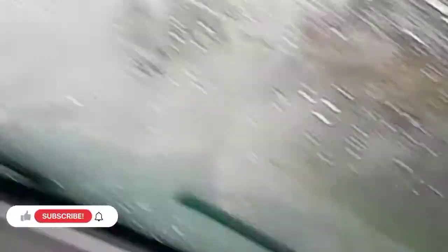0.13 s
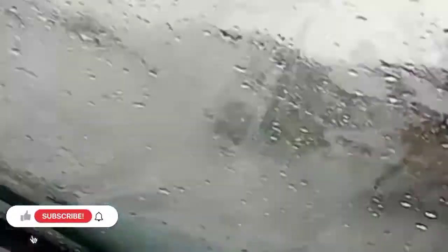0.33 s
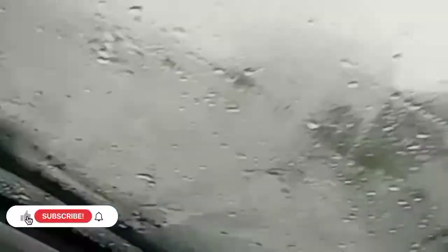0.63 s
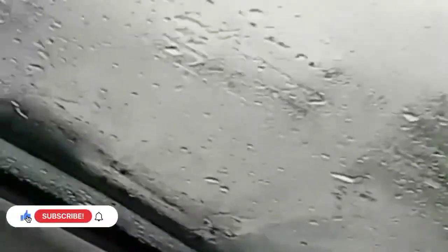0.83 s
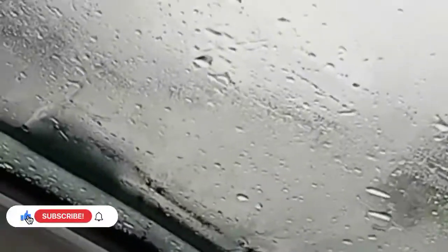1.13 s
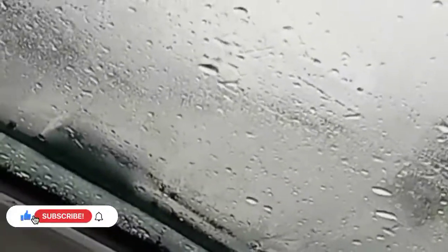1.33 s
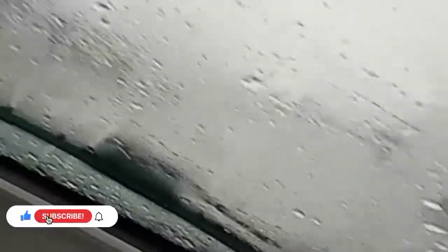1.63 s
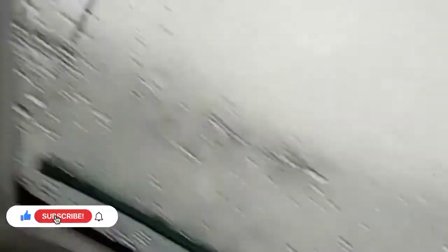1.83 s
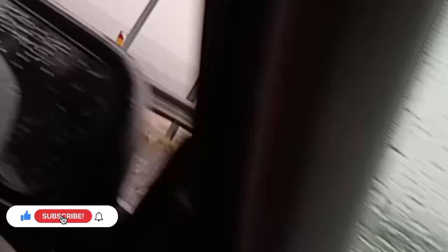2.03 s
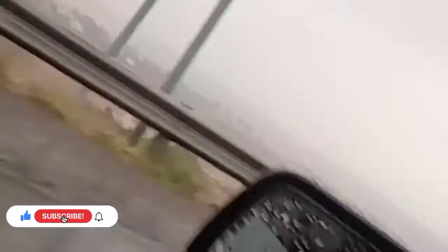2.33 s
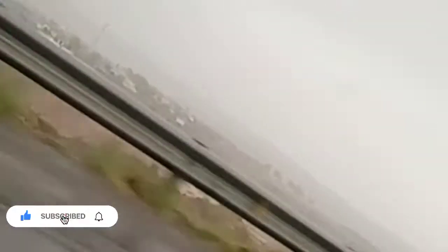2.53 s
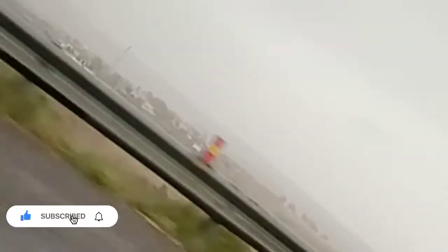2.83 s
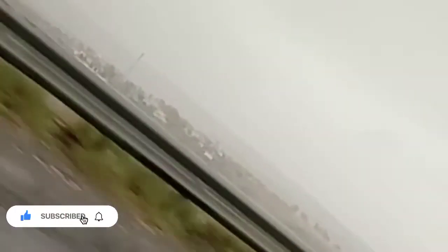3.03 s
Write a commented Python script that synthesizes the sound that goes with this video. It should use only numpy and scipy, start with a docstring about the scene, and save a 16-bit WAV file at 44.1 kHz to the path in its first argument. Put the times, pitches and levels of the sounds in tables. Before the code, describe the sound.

Car interior driving in rain: steady deep rumble, faint engine hum, crisp pattering drops and soft hiss

```python
"""Inside a car driving through rain, with a hand-held phone as the listening point.
At first the phone faces ahead: shaped noise roars as road and wind, and wandering sines make two low cabin
hums and the engine. Spray hisses, easing in the first second, while ticks and noise bursts ring as rain
drops: a dense patter, larger nearer drops and a few short notes. From about 1.7 s the phone turns to the
side window, the balance of roar, hums and engine changes, and the upper roar then swells."""
import sys
import numpy as np
from scipy import signal
from scipy.fft import rfft, irfft
from scipy.io import wavfile

SR = 44100
rng = np.random.default_rng(int(sys.argv[2]) if len(sys.argv) > 2 else 0)


def dump(signal):
    """Clip the signal to [-1, 1] and save it as 16-bit WAV at the path in sys.argv[1]."""
    limited = np.clip(np.atleast_2d(signal).T, -1, 1)
    pcm = np.round(limited * 32767).astype(np.int16)
    wavfile.write(sys.argv[1], SR, pcm)


N = 140679

# Colour of spray and far rain, also lent to the patter: (pitch_hz, relative level_db per Hz)
SPRAY_COLOUR = [(800, 16), (1100, -6.5), (1400, -9.5), (2300, -9), (2700, -8), (4000, -16), (5200, -21.5),
                (6600, -21.5), (7300, -32), (8100, -38.5), (10000, -43), (11500, -45), (13200, -46.5),
                (13900, -40.5), (14600, -42.5), (15100, -37), (16500, -28)]


def amp(db):
    """Turn decibels into a gain."""
    return 10 ** (np.asarray(db) / 20)


def rms_one(x):
    """Scale a signal to an rms of 1."""
    return x / np.sqrt(np.mean(x ** 2) + 1e-20)


def in_time(rows):
    """Read a (time, value) curve at every sample, with straight lines between its points."""
    return np.interp(np.arange(N) / SR, *np.transpose(rows))


def at_hz(points, hz):
    """Read a (frequency, level) curve on a logarithmic frequency axis."""
    point_hz, level_db = np.transpose(points)
    return np.interp(np.log(hz), np.log(point_hz), level_db)


def drift(rate):
    """Random wandering around zero, spread about 1: noise smoothed twice at the rate in Hz."""
    step = 40  # samples between the slow values
    r = np.exp(-2 * np.pi * rate * step / SR)
    white = rng.standard_normal(N // step + 2002)
    slow = signal.lfilter([1], [1, -2 * r, r * r], white)[2000:]  # leave out the filter's start
    return np.interp(np.arange(N) / step, np.arange(len(slow)), rms_one(slow - slow.mean()))


def resonate(x, hz, width_hz):
    """Ring at one frequency: a two-pole resonance with a gain of about 1 at its top."""
    r = np.exp(-np.pi * width_hz / SR)
    feedback = [1, -2 * r * np.cos(2 * np.pi * hz / SR), r * r]
    return signal.lfilter(np.array([1, 0, -1]) * (1 - r * r) / 2, feedback, x)


def coloured(spectrum, x, low, high):
    """Shape a signal by a spectrum and keep it between low and high (Hz) with soft edges."""
    hz = np.maximum(np.fft.rfftfreq(N, 1 / SR), 1)
    edge = 1 / np.sqrt((1 + (low / hz) ** 40) * (1 + (hz / high) ** 40))
    return irfft(rfft(x) * amp(at_hz(spectrum, hz)) * edge, N)


def patchy(spectrum, edges, patchy_db, rate):
    """Coloured noise in bands; each band's level flickers with a shared and an own drift."""
    shared = drift(rate / 4)
    out = 0
    for low, high in zip(edges, edges[1:]):
        band = coloured(spectrum, rng.standard_normal(N), low, high)
        out = out + band * amp(patchy_db * (shared + drift(rate)))
    return out


def roar(turn):
    """Road and wind through the body: shaped noise whose colour fades from ahead to side with the turn."""
    # Roar colours, facing ahead and facing the side window: (pitch_hz, relative level_db per Hz)
    ahead_colour = [(25, -40.5), (45, -10), (60, -5.5), (78, -11), (100, -9), (115, -8), (140, -5.5),
                    (160, -8), (200, -1.5), (257, -8.5), (280, -13.5), (350, -16.5), (510, -22), (560, -25),
                    (1500, -43.5), (2200, -60.5)]
    side_colour = [(25, -37.5), (45, -6.5), (60, 0), (78, -8.5), (100, 2), (119, -4), (160, 0.5),
                   (209, 1.5), (253, 3.5), (316, -11.5), (375, -13), (476, -14), (800, -22.5),
                   (1500, -36.5), (2200, -59)]
    # Lift of the part above 290 Hz, before each colour is evened to one level: (time_s, lift_db)
    upper_lift = [(0, 1.5), (0.5, -0.1), (1.2, 0.6), (1.5, 0), (1.95, -0.5), (2.4, 2), (3.19, 2)]
    roar_db, patchy_db = -18.5, 0.71
    swell = amp(in_time(upper_lift))
    out = 0
    for spectrum, share in ((ahead_colour, 1 - turn), (side_colour, turn)):
        bass = patchy(spectrum, [10, 130, 290], patchy_db, rate=29)
        upper = patchy(spectrum, [290, 700, 1800], patchy_db, rate=10)
        out = out + np.sqrt(share) * rms_one(bass + upper * swell)
    return amp(roar_db) * out


def hums(turn):
    """Two low hums of the car's cabin, booming as it drives: sines wandering in pitch and level."""
    # One row a hum: (pitch_hz, wander as a share of pitch, waver_db, ahead_db, side_db), levels as rms
    hum_rows = [(55.9, 0.031, 2.5, -26.5, -28.5), (96.9, 0.012, 1.5, -24.5, -25)]
    out = 0
    for hz, wander, waver_db, ahead_db, side_db in hum_rows:
        level = amp(ahead_db + (side_db - ahead_db) * turn + waver_db * drift(3.5))
        phase = 2 * np.pi * np.cumsum(hz * (1 + wander * drift(6.5))) / SR
        out = out + np.sqrt(2) * level * np.sin(phase + rng.uniform(0, 2 * np.pi))
    return out


def engine(turn):
    """Engine orders: wavering sines on whole multiples of one slightly wandering base rate."""
    # One row an order: (multiple of the base rate, relative ahead_db, relative side_db)
    orders = [(4, -25.5, -33), (5, -26, -28.5), (6, -24.5, -30), (7, -32, -38), (10, -36.5, -34.5),
              (11, -40.5, -45.5)]
    base_hz, wander_share = 34.88, 0.009
    engine_db, waver_db = 0.58, 2.5
    phase = 2 * np.pi * np.cumsum(base_hz * (1 + wander_share * drift(2.9))) / SR
    out = 0
    for multiple, ahead_db, side_db in orders:
        level = amp(ahead_db + (side_db - ahead_db) * turn + waver_db * drift(5.4))
        out = out + np.sqrt(2) * level * np.sin(round(multiple) * phase + rng.uniform(0, 2 * np.pi))
    return amp(engine_db) * out


def spray(level_db):
    """Spray and far rain: many blended splashes heard as hissing noise, its highest part flickering faster."""
    low = patchy(SPRAY_COLOUR, [1100, 2200, 4400, 8000, 14200], 0.8, rate=6.7)
    top = patchy(SPRAY_COLOUR, [14200, 20000], 1.8, rate=25)
    return amp(level_db) * rms_one(low + top)


def plips():
    """Some drops ring one short note: a sine with a quick rise that dies away."""
    # One row a note: (start_s, relative level_db, pitch_hz)
    notes = [(0.676, -24.5, 1140), (0.883, -24, 2524), (1.009, -21.5, 2460), (1.5, -26, 2660),
             (2.043, -24.5, 1786), (2.072, -26.5, 1810), (2.118, -24, 1640), (2.36, -30, 1547),
             (2.454, -22, 1580), (2.678, -25.5, 1660), (3.15, -25, 1725)]
    plip_db, t60_s, rise_s = -5.5, 0.053, 0.00088
    t = np.arange(SR // 10) / SR
    out = np.zeros(N + SR)
    for start_s, level_db, hz in notes:
        i = int(start_s * SR)
        envelope = amp(level_db + plip_db - 60 * t / t60_s) * np.minimum(t / rise_s, 1)
        out[i:i + len(t)] += envelope * np.sin(2 * np.pi * hz * t)
    return out[:N]


def splash(where, tick_db, band_db, pitches):
    """Each drop is a dry tick and a dying noise burst; both ring every panel resonance at its own strength."""
    burst_t60_s, ring_cycles = 0.032, 11.5
    fall = amp(-60 / (burst_t60_s * SR))
    out = 0
    for hz, tick, burst in zip(pitches, tick_db.T, band_db.T):
        ticks, clicks = np.full((2, N), 1e-12)
        np.add.at(ticks, where, amp(tick) * np.sqrt(SR / hz))
        np.add.at(clicks, where, amp(burst))
        # Each click becomes a falling envelope that shapes the noise
        x = ticks + signal.lfilter([1], [1, -fall], clicks) * rng.standard_normal(N)
        width_hz = hz * 3 / ring_cycles
        ringing = resonate(resonate(x, hz, width_hz), hz, width_hz)
        out = out + ringing * np.sqrt(SR / hz)
    return out


def patter(level_db, hz):
    """Small drops at random times and sizes, coloured like the spray and rising and falling with it."""
    drops_per_s, patter_db, tick_db = 280, -52.5, 13.5
    size_scale_db, colour_spread_db = 4.39, 6.5
    thin_hz = 1800  # small drops carry little below this
    count = int(np.ceil(drops_per_s * N / SR))
    draw = rng.random((count, 2))
    where = (draw[:, 0] * N).astype(int)
    size = patter_db + level_db[where] - level_db.mean()
    size = size - size_scale_db * np.log(1 - .98 * draw[:, 1])  # many small drops, few big ones
    burst = size[:, None] + at_hz(SPRAY_COLOUR, hz) + 10 * np.log10(hz / 2500)
    burst = burst + colour_spread_db * np.tanh(rng.standard_normal((count, len(hz))))
    burst = burst - 10 * np.log10(1 + (thin_hz / hz) ** 4)
    return where, burst + tick_db, burst


def large_drops(hz):
    """Larger, nearer drops at set times; each has its own tick strength and splash colour."""
    # One row a drop: (start_s, tick_db, splash_db at 1-2, 2-4, 4-7, 8-12 and 12-16 kHz), relative levels
    drops = np.array([(0.0608, -24, -54, -33, -24.5, -66, -61), (0.1161, -6, -66, -17, -31, -62, -44),
                      (0.1773, -22, -54.5, -39, -50.5, -67, -67), (0.195, -32, -30.5, -22, -40, -59, -61),
                      (0.2927, -39, -31, -38.5, -43.5, -74, -74),
                      (0.3298, -16, -37.5, -45.5, -34, -53, -56),
                      (0.392, -41, -39.5, -20.5, -24.5, -42, -52),
                      (0.4269, -24.5, -35, -20, -28.5, -59, -38), (0.5158, -16, -29, -22, -24.5, -44, -71),
                      (0.598, -29, -60, -25, -33, -64, -66), (0.6773, -23, -26.5, -26.5, -31.5, -70, -64),
                      (0.761, -35.5, -42, -47, -45, -71, -69), (0.8075, -32, -32.5, -37, -37, -55, -52),
                      (0.8824, -19.5, -31, -35.5, -32.5, -45, -30.5),
                      (1.0051, -33.5, -25.5, -22, -27.5, -77, -67), (1.0854, -36, -48, -36, -35, -59, -68),
                      (1.1335, -32.5, -50.5, -54, -54, -59, -62.5),
                      (1.1937, -35, -38, -35, -34, -69, -64.5), (1.2121, -29, -40, -41.5, -33, -72, -72),
                      (1.579, -34, -36.5, -33, -42, -68, -67), (1.7413, -41, -45, -39, -28.5, -69, -54),
                      (1.7905, -17.5, -25, -38, -21, -71.5, -62), (1.8164, -29, -38, -36, -31.5, -73, -60),
                      (1.849, -30, -43, -46.5, -39.5, -67, -62.5),
                      (1.9002, -25, -36, -38.5, -46, -63.5, -70), (1.9285, -29, -46, -30, -26.5, -76, -67),
                      (2.0449, -35, -38.5, -33, -33, -69, -66), (2.0706, -31, -41.5, -43, -31.5, -61, -57),
                      (2.1191, -20, -31, -22, -31.5, -47, -62), (2.2762, -37, -22, -33, -34, -60, -60),
                      (2.3376, -26.5, -34, -32, -29, -64, -69), (2.4222, -35, -29, -23.5, -40, -68, -68),
                      (2.4529, -26, -31, -32.5, -50, -71, -62), (2.4883, -19, -34.5, -35, -30, -77, -64),
                      (2.5402, -24, -29, -48, -40, -65, -62), (2.607, -27, -41.5, -24.5, -27.5, -64, -66),
                      (2.7796, -28.5, -34.5, -43, -69, -89, -72), (2.856, -31, -32.5, -34, -44.5, -67, -59),
                      (2.9676, -25, -31.5, -24, -24, -66, -56), (3.087, -21, -30, -37, -33.5, -66, -49),
                      (3.1054, -13.5, -38, -62, -39.5, -74, -66), (3.1381, -26.5, -29, -35, -32, -71, -65)])
    # Where the splash levels sit in pitch: (pitch_hz, column number in the drop table)
    band_points = [(1400, 2), (2800, 3), (4200, 4), (6600, 4), (8300, 5), (11500, 5), (13000, 6)]
    drop_db, tick_db, spread_db = -11.5, -20.5, 2.2
    point_hz, column = np.transpose(band_points)
    burst = np.array([np.interp(np.log(hz), np.log(point_hz), row[column]) for row in drops])
    burst = burst + spread_db * rng.standard_normal(burst.shape)
    # The tick shares the splash's colour, but has its own level
    tick = tick_db + drops[:, 1:2] + burst - drops[:, 2:].max(axis=1, keepdims=True)
    return (drops[:, 0] * SR).astype(int), tick, burst + drop_db


def rain(level_db):
    """Drops on glass and roof ring the same resonances, their treble shaped by the phone's microphone."""
    # Treble colour of the phone's microphone: (pitch_hz, gain_db)
    mic_colour = [(6600, -3), (7400, -9), (8200, -14), (14000, -13.5), (14700, -14)]
    hz = np.geomspace(1000, 15200, 26)
    big_where, big_tick, big_burst = large_drops(hz)
    small_where, small_tick, small_burst = patter(level_db, hz)
    # Lift each resonance to undo the microphone colour at its pitch; what leaks to other pitches is shaped
    mic_db = at_hz(mic_colour, hz)
    tick = np.r_[big_tick, small_tick] - mic_db
    burst = np.r_[big_burst, small_burst] - mic_db
    lifted = splash(np.r_[big_where, small_where], tick, burst, hz)
    return coloured(mic_colour, lifted, 500, 20000)


def scene():
    """Add all sources at the phone while it turns."""
    # Phone turned to the side window: (time_s, share from 0 to 1)
    turn_rows = [(0, 0.01), (1.7, 0), (2.2, 0.89), (3.19, 0.98)]
    # Level of spray and far rain, which the patter follows: (time_s, level_db)
    spray_level = [(0.0, -34.5), (0.13, -39), (0.73, -40.5), (1.05, -40), (1.32, -41.5), (2.34, -39),
                   (3.19, -40)]
    turn = np.clip(in_time(turn_rows), 0, 1)
    level_db = in_time(spray_level)
    car = roar(turn) + hums(turn) + engine(turn)
    wet = spray(level_db) + plips() + rain(level_db)
    return (car + wet)[None]


def record(dry):
    """Gain control evens the level, peaks are rounded, the deepest rumble and the top are cut."""
    squeeze, squeeze_s = 0.25, 0.04  # share of the level swing removed, averaging time
    round_top = 0.72  # ceiling of the rounded peaks, before the two cuts
    rumble_cut_hz, top_cut_hz = 27.5, 15760
    r = np.exp(-1 / (squeeze_s * SR))
    mean = np.mean(dry ** 2)
    power = signal.lfilter([1 - r], [1, -r], dry ** 2 - mean) + mean
    # Half the exponent, because power is the square of level
    even = dry * (np.maximum(power, .05 * mean) / mean) ** (-squeeze / 2)
    rounded = round_top * np.tanh(even / round_top)
    rumble_cut = signal.butter(4, rumble_cut_hz, "high", fs=SR, output="sos")
    top_cut = signal.ellip(12, .5, 60, top_cut_hz, fs=SR, output="sos")
    return signal.sosfilt(top_cut, signal.sosfilt(rumble_cut, rounded))


dry = scene()
out = record(dry)
dump(out)
```